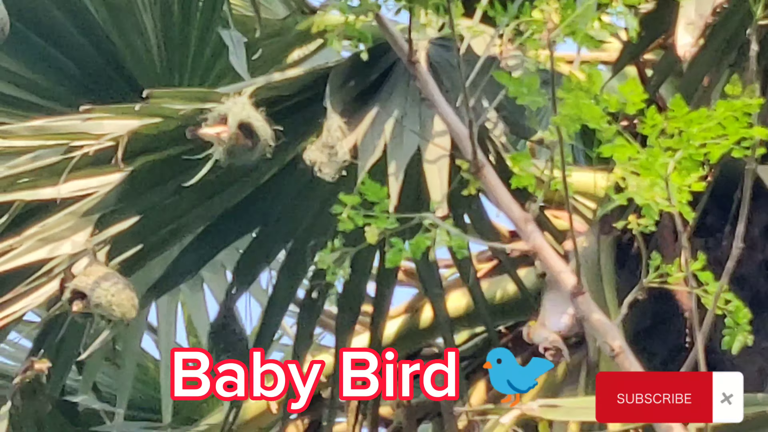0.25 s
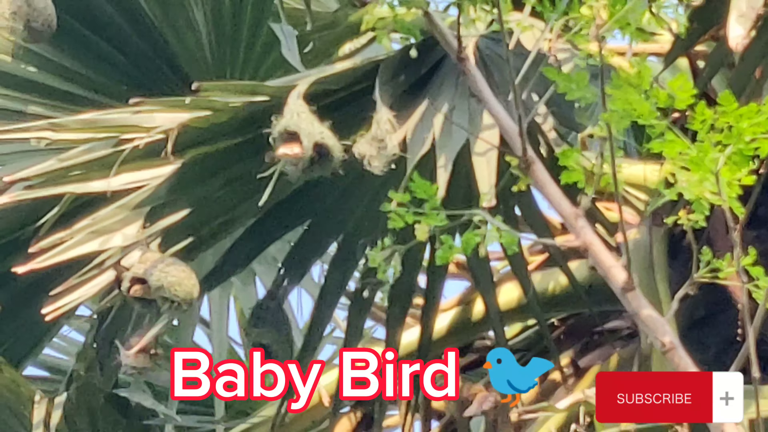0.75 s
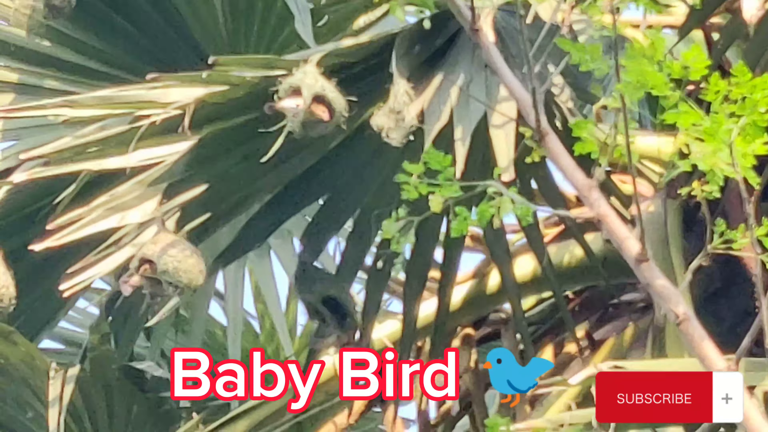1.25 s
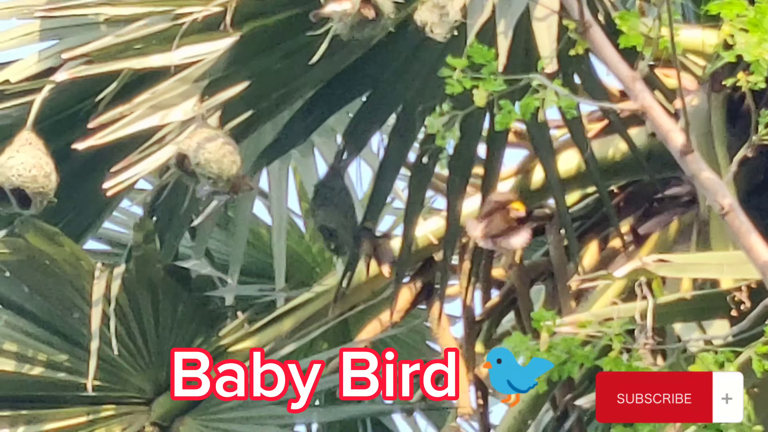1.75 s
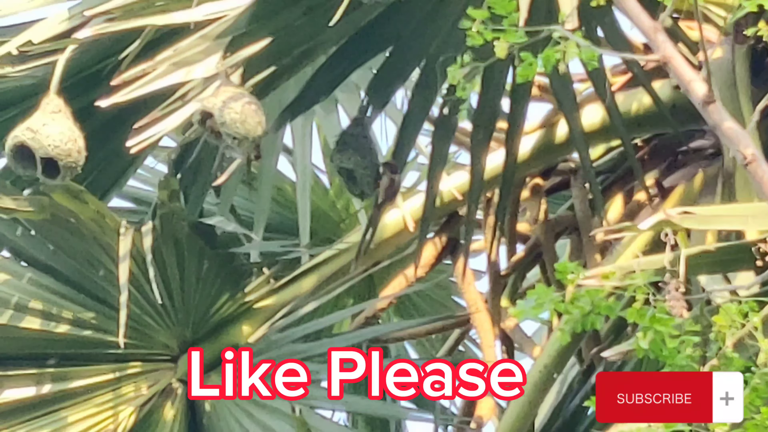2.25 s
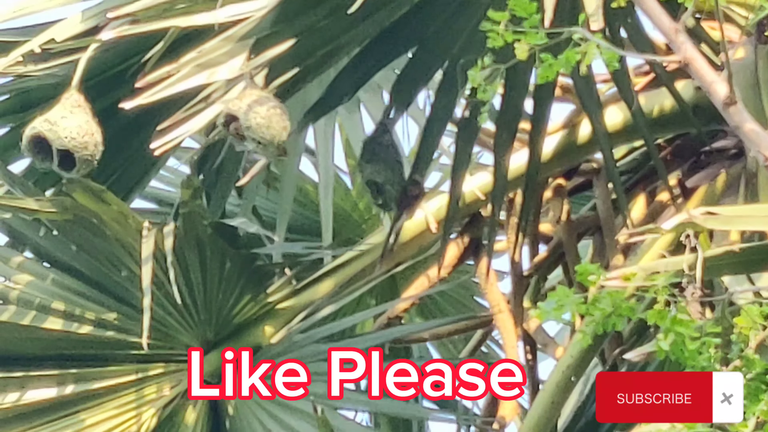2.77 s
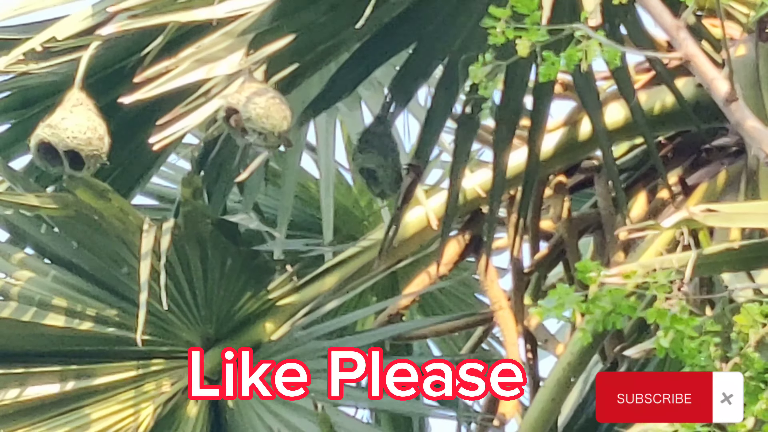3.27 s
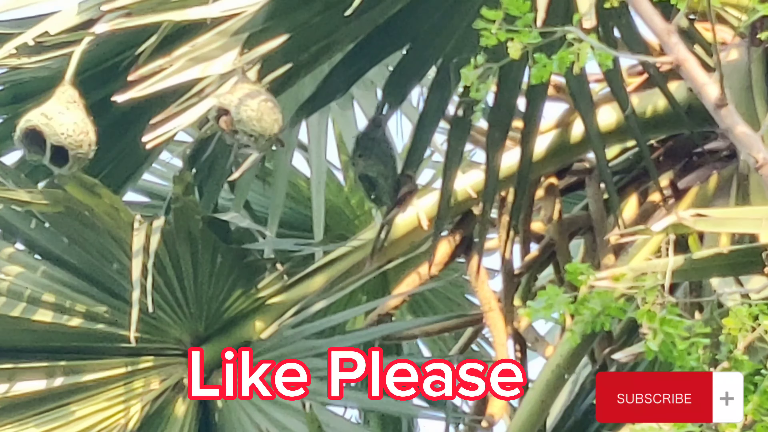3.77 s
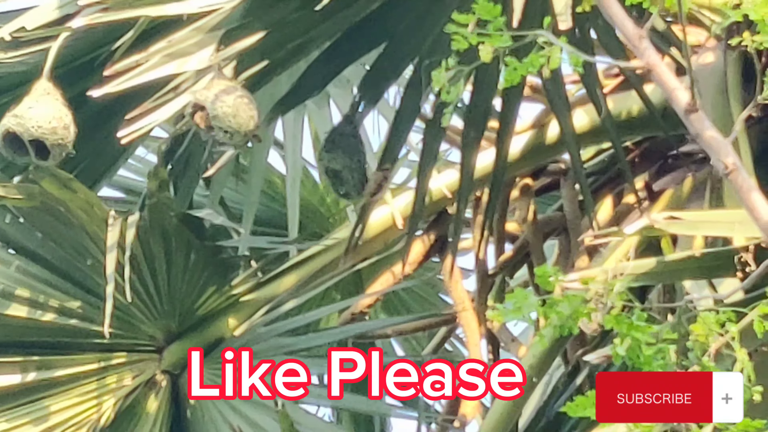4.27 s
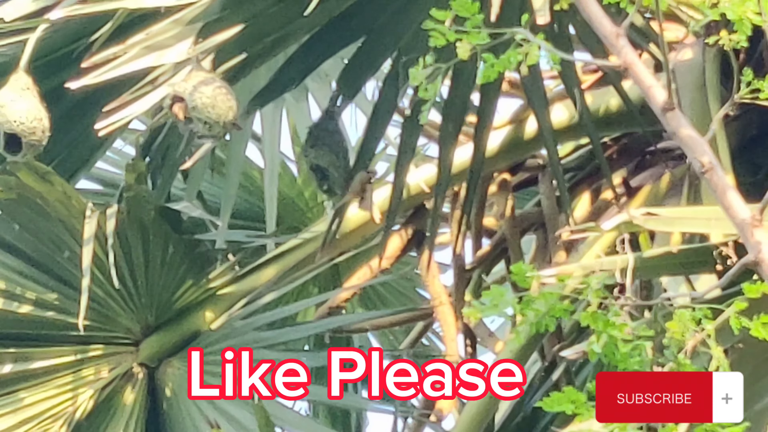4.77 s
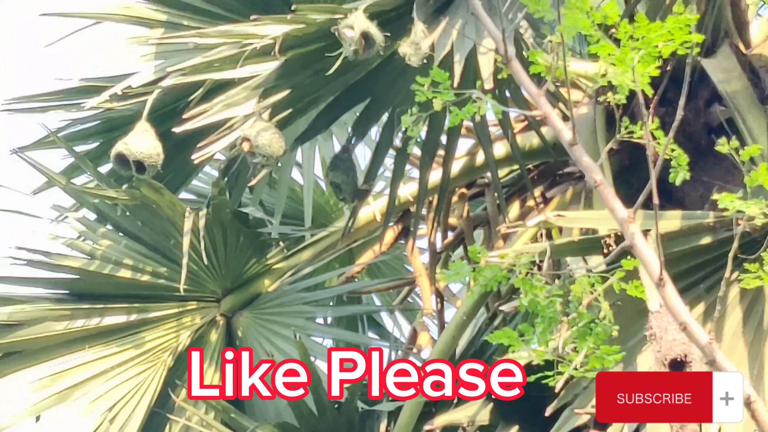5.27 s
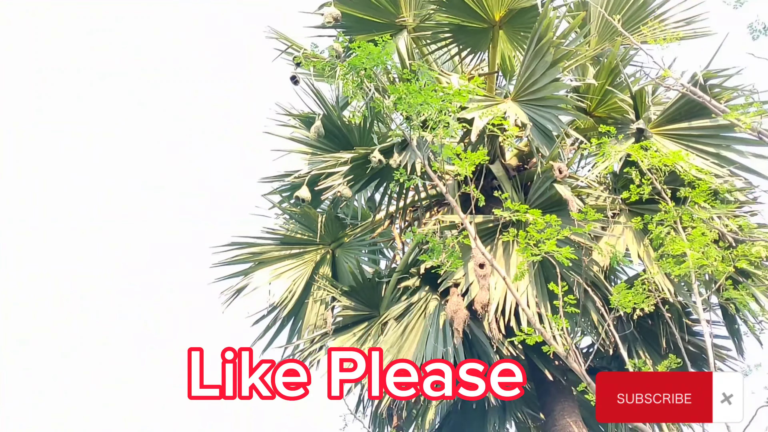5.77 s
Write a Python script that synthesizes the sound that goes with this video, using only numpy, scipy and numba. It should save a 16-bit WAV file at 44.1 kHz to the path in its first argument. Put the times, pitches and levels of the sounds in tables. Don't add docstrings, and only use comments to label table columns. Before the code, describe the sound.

A weaver bird colony chatters in dry buzzing rasps from a palm, with a whistle, a long buzz, faint dove coos and fingers bumping the phone.

```python
import sys
import numpy as np
from scipy import signal
from scipy.fft import rfft, irfft, next_fast_len
from scipy.io import wavfile
from scipy.ndimage import uniform_filter1d
from numba import njit

SR = 44100
rng = np.random.default_rng(int(sys.argv[2]) if len(sys.argv) > 2 else 0)


def unload_wav(signal):
    wavfile.write(
        sys.argv[1],
        SR,
        np.round(np.clip(np.atleast_2d(signal).T, -1, 1) * 32767).astype(np.int16),
    )


def attenuation_scalar(level_db):
    decades = np.asarray(level_db, float) / 20
    return 10 ** decades


N = 265482
T = np.arange(N) / SR

# frequency in Hz, level in dB per Hz.
AIR = [(12, -29), (20, -9), (60, -3), (113, -13.5), (210, -20.5), (270, -23), (367, -24), (738, -29),
       (1440, -34), (2910, -37.5), (3250, -38), (7110, -32), (8180, -45), (14300, -43), (16000, -35.5)]
# frequency in Hz, share from 0 to 1.
AIR_SHARED = [(60, 0.76), (300, 0.65), (800, 0.28), (1500, 0.05)]
# frequency in Hz, difference in dB.
AIR_PORTS = [(100, 1.5), (3000, -1), (6500, 0), (8200, -19.5), (9800, 0.5)]
# frequency in Hz, difference in dB.
BIRD_PORTS = [(1500, 2), (2600, 1), (3300, -12), (4200, 1), (5800, 3), (6800, -0.5), (8300, -16),
              (9600, -42)]
# frequency in Hz, gain in dB.
BIRD_TONE = [(900, 7.5), (1700, 2.5), (2600, 2), (2850, -0.5), (3600, 0), (8000, 2), (9000, -12),
             (10000, -53), (16000, -67)]
# frequency in Hz, gain in dB.
BEND = [(8500, -56), (10500, -23), (12500, -17), (14500, -1.5), (15400, 4), (15700, -62)]

# start in seconds, length in seconds, level in dB, pitch in Hz, throb from 0 to 1.
DOVE_OPENING = [
    (0.051, 0.077, -58, 600, 0),
    (0.121, 0.14, -53.5, 755, .1),
    (0.265, .11, -55, 630, .3),
    (0.38, 0.2, -64.5, 630, 0.3),
]
DOVE_OPENING_SAG = -53.5, 37, -5.5, 75
# start in seconds, level in dB, then lead-in, roll and hold lengths in seconds.
COOS = [
    (1.179, -58.5, 0.12, .15, .27),
    (2.098, -56.5, 0.091, .2, 0.22),
    (2.966, -56, 0.18, 0.19, 0.022),
]
# pitch in Hz, throb from 0 to 1, level in dB, pitch lost in Hz.
COO_HZ = (592, 636, 611)
COO_THROB = (0.15, 0.61, .15)
COO_DB = (-3, -2, -0.9)
COO_SAG = (-16, 20.4, 29.87)

# start in seconds, peak in dB, ring in Hz, left minus right in dB.
TAPS = [(0.011, -41, 251, -17.5), (1.823, -41, 328, 24.5), (1.85, -33, 305, 15.5), (1.912, -40.5, 193, 22),
        (2.182, -42, 251.5, 13.5), (2.682, -42.5, 447, 11), (2.73, -44, 263, -7),
        (3.399, -45.5, 203.3, 22.5), (3.568, -36, 225, -2), (4.044, -44.5, 295, 24), (4.366, -29, 563, -2),
        (5.795, -47, 207, -14)]
# start in seconds, length in seconds, first Hz, last Hz, level in dB.
CHIRPS = [
    (2.571, 0.018, 4440, 2947, -26),
    (2.594, 0.014, 3250, 2980, -38),
    (2.59, 0.15, 6060, 5470, -29.5),
    (3.155, 0.061, 1340, 1590, -52.5),
    (4.09, .05, 4940, 4820, -64),
    (4.215, 0.064, 4920, 4670, -60),
    (4.26, 0.0344, 6220, 5500, -50),
    (5.779, .05, 3810, 3440, -48.5),
    (5.779, 0.062, 7740, 6550, -46.5),
]
# start in seconds, length in seconds, first Hz, last Hz, level in dB.
SQUEAKS = [
    (3.568, 0.0029, 1410, 1610, -29),
    (3.588, 0.0083, 1440, 1293, -33.5),
    (4.372, 0.0055, 1297, 1731, -28),
    (4.418, 0.015, 1366, 1267, -36),
]
# start in seconds, length in seconds, level in dB.
DRONE = [
    (2.844, 0.062, -37.5),
    (2.9, 0.29, -32),
    (3.255, .13, -35),
]
# start in seconds, length in seconds, level in dB, first Hz, last Hz.
WHISTLE = [
    (1.96, 0.039, -46.5, 3760, 3790),
    (2.003, 0.025, -32, 3296, 3330),
    (2.02, 0.055, -23.5, 3490, 3478),
    (2.08, .095, -35, 3270, 3590),
    (2.177, .045, -34.5, 3580, 3640),
    (2.255, .075, -36.5, 3620, 3560),
    (2.332, 0.025, -27, 3370, 3300),
    (2.367, .035, -38.5, 3350, 3450),
    (2.403, 0.034, -30, 3460, 3440),
    (2.45, 0.075, -44, 3480, 3520),
]
# start in seconds, peak in dB, pitch in Hz.
SNAPS = [(0.755, -33, 5050), (0.9568, -20.5, 5130), (1.1361, -13, 5870), (1.1645, -14, 6480),
         (1.1715, -33, 6620), (1.271, -14.5, 5280), (1.3044, -25, 6070), (1.411, -14.5, 5620),
         (1.545, -24, 6320), (1.5937, -19, 6050), (1.7294, -14, 5720), (1.8627, -19, 5340),
         (2.0654, -29, 5050), (2.2228, -25, 5560), (2.445, -21, 5510)]
# start in seconds, length in seconds, level in dB,
# resonance in Hz, edge (beak) or chest (throat) in dB.
BUZZ = [
    [(2.61, 0.7845, -26, 5160, -51.5)],
    [(2.62, 0.798, -39, 3912, -16)],
]
# start in seconds, length in seconds, level in dB, throat in dB, edge in dB.
CHESTY = [
    (0.126, 0.026, -52.5, -4.5, -5.5),
    (0.24, .07, -42, -11, -5.5),
    (0.32, 0.047, -40.5, -11, -7.5),
    (0.426, 0.1, -36.5, -16, -22.5),
    (0.65, 0.019, -44.5, -10.5, -8.5),
]
THIN = [
    (3.866, 0.02, -45, -1, -5),
    (4.69, .025, -63, 1, -8),
    (4.93, 0.014, -47.5, 0, -7),
    (5.078, 0.016, -44, -3, -2),
    (5.199, 0.12, -40.5, -7.5, -26),
    (5.524, 0.11, -40.5, -7, -30.5),
]
# start in seconds, length in seconds, level in dB, beak in Hz, edge in dB.
BEAK_RASPS = [(0.72, 0.1, -25, 5950, -17.5), (0.87, 0.076, -35, 5960, -14), (0.94, 0.033, -30.5, 5200, -30),
              (1.058, 0.088, -30, 5960, -19.5), (1.125, 0.067, -24.5, 6290, -13.5),
              (1.2, 0.11, -29, 5930, -15.5), (1.26, 0.072, -30, 6330, -10.5),
              (1.35, 0.067, -30, 6000, -21.5), (1.51, .1, -26.5, 5670, -27.5),
              (1.62, 0.14, -32.5, 5530, -15), (1.71, 0.08, -35, 6040, -8.5), (1.8, 0.11, -31, 5400, -16.5),
              (1.992, 0.088, -36.5, 5420, -14), (2.165, 0.098, -34.5, 5550, -13.5),
              (2.29, 0.17, -32, 5550, -25), (2.44, 0.079, -28.5, 5550, -32.5),
              (2.655, 0.061, -29.5, 6150, -27), (2.78, 0.013, -52, 6120, 11), (2.95, 0.029, -37, 6400, -15),
              (3.15, 0.061, -32, 5610, -7.5), (3.497, 0.092, -36, 4810, -17.5)]
# start in seconds, length in seconds, level in dB, throat in Hz, chest in dB.
THROAT_RASPS = [(0.721, 0.12, -40, 4070, -3.5), (0.836, 0.12, -38.5, 3840, -10),
                (1.051, 0.081, -40.5, 3300, -14.5), (1.121, 0.11, -30, 3940, -23),
                (1.224, 0.064, -35.5, 3800, -19), (1.271, .09, -29.5, 3970, -20.5),
                (1.368, 0.049, -39, 3460, -17), (1.512, 0.12, -42.5, 3250, -6.5),
                (1.596, 0.15, -36.5, 3720, -19), (1.738, 0.068, -32.5, 3840, -23),
                (1.793, 0.11, -40.5, 3850, -7), (1.978, 0.11, -44, 2900, -9.5),
                (2.159, 0.078, -42.5, 2890, -10), (2.292, .24, -44.5, 2742, -7.5),
                (2.653, 0.059, -48.5, 3457, -1), (3.138, 0.11, -37, 4360, -20.5),
                (3.497, 0.083, -40, 3080, -9)]
# calls, beak in Hz, throat in Hz, chest level relative to the throat in dB.
LONE_BIRDS = [(CHESTY, 5950, 3500, 2), (THIN, 5950, 3910, -11.5)]

RASP_SHAPE = dict(swell_s=0.035, onset_db=13, sag_db=3, release_db_s=900, fade_s=0.004)
BUZZ_SHAPE = dict(swell_s=0.027, onset_db=12.5, sag_db=1.95, release_db_s=649, fade_s=0.0035)
NOTE_SHAPE = dict(swell_s=0.012, onset_db=3, sag_db=2, release_db_s=800, fade_s=0.004)
LEFT_LAG = 8
DRONE_HZ, OVERTONE_DB = 4120, -25
THROAT_FLOOR_HZ = 2800


def unit(x):
    return x / np.sqrt(np.mean(x ** 2))


def along(table, hz):
    f, v = np.transpose(table)
    return np.interp(np.log(hz + 1), np.log(f), v)


def shape(x, db, lag_s=0):
    size = next_fast_len(N + 2048)
    hz = np.arange(size // 2 + 1) * SR / size
    response = attenuation_scalar(db(hz)) * np.exp(-2j * np.pi * hz * lag_s)
    return irfft(rfft(x, size) * response, size)[..., :N]


def walk(rate):
    k = max(int(SR / rate), 1)
    held = rng.standard_normal(N // 16)[np.arange(N) // max(k, 17)]
    return unit(uniform_filter1d(uniform_filter1d(held, k), k))


@njit
def svf(x, g, k):
    y, b, l = np.empty(len(x)), 0., 0.
    for i in range(len(x)):
        v = (b + g[i] * (x[i] - l)) / (1 + g[i] * (g[i] + k[i]))
        b, l, y[i] = 2 * v - b, l + 2 * g[i] * v, k[i] * v
    return y


def ring(x, hz, width_hz):
    g = np.tan(np.pi * hz / SR) + np.zeros(N)
    k = width_hz / hz + np.zeros(N)
    return unit(svf(svf(x, g, k), g, k))


def calls(rows, swell_s, onset_db, sag_db, release_db_s, fade_s):
    power = np.full(N, 1e-14)
    mix = 1e-14 * np.outer([0, *rows[0][3:]], np.ones(N))
    for s, length, db, *columns in rows:
        t = np.arange(int((length + 50 / release_db_s) * SR)) / SR
        u = np.minimum(t / length, 1)
        rise_db = onset_db * min(length / 0.19, 1) * np.clip(1 - t / min(swell_s, length / 3), 0, 1)
        level_db = db - rise_db - sag_db * u - release_db_s * np.maximum(t - length, 0)
        p = np.minimum(t / fade_s, 1) ** 2 * attenuation_scalar(2 * level_db)
        power[int(s * SR):][:len(t)] += p
        mix[:, int(s * SR):][:, :len(t)] += p * np.array([u, *np.outer(columns, np.ones(len(t)))])
    return np.sqrt(power), *(mix / power)


def notes(rows):
    gain, u, first, last = calls(rows, **NOTE_SHAPE)
    return gain, uniform_filter1d(first + (last - first) * u, int(0.01 * SR))


def tone(gain, hz, wobble, wobble_hz, flutter_db, second_db, throb=0, throb_hz=0):
    beat = np.clip(throb, 0, 1) * np.sin(2 * np.pi * throb_hz * T)
    phase = 2 * np.pi * np.cumsum(hz * (1 + wobble * walk(wobble_hz) + 0.18 * beat)) / SR
    wave = np.sin(phase) + attenuation_scalar(second_db) * np.sin(2 * phase)
    return np.sqrt(2) * gain * attenuation_scalar(flutter_db * walk(wobble_hz)) * (1 + beat) * wave


def glides(table, step_db, wobble, top_hz, lift_db):
    out, waver = np.zeros(N), 1 + wobble * walk(500)
    for s, length, hz0, hz1, db in table:
        u = np.arange(int(length * SR)) / (length * SR)
        hz = hz1 + (hz0 - hz1) * (1 - u) ** 1.8
        phase = 2 * np.pi * np.cumsum(hz * waver[int(s * SR):][:len(u)]) / SR
        stack = np.zeros(len(u))
        for k in range(int(top_hz / max(hz0, hz1))):
            mouth_db = lift_db * np.exp(-(((k + 1) * hz1 - 6700) / 1800) ** 2)
            stack += attenuation_scalar(k * step_db + mouth_db) * np.cos((k + 1) * phase)
        envelope = np.minimum(1, 8 * np.minimum(u, 1 - u)) * (1 - 0.27 * u)
        out[int(s * SR):][:len(u)] += attenuation_scalar(db) * envelope * stack
    return out


def air():
    common, own = rng.standard_normal(N), rng.standard_normal((2, N))

    def share(hz):
        return np.clip(along(AIR_SHARED, hz), 0.01, 0.99)

    mix = shape(common, lambda hz: 10 * np.log10(share(hz)))
    mix = mix + shape(own, lambda hz: 10 * np.log10(1 - share(hz)))
    both = shape(mix, lambda hz: along(AIR, hz) + np.outer([0.5, -0.5], along(AIR_PORTS, hz)))
    low = shape(both, lambda hz: -10 * np.log10(1 + (hz / 1200) ** 4))
    swelling = low * attenuation_scalar(walk(1.186)) + (both - low) * attenuation_scalar(1.2 * walk(16))
    fading_db = 1.23 * (1 - T / 6)
    return attenuation_scalar(-48.5 + fading_db) * unit(swelling)


def dove():
    rows = [(*note, sag) for note, sag in zip(DOVE_OPENING, DOVE_OPENING_SAG)]
    for s, db, *parts in COOS:
        starts = s + np.cumsum([0, *parts[:-1]])
        rows += zip(starts, parts, db + np.array(COO_DB), COO_HZ, COO_THROB, COO_SAG)
    gain, u, hz, throb, sag = calls(rows, **NOTE_SHAPE)
    pitch = uniform_filter1d(hz - sag * u, int(0.025 * SR))
    return tone(gain, pitch, 0.01, 43, 0.39, -31.5, throb, throb_hz=38.8)


def taps():
    out, t = np.zeros((2, N)), np.arange(600) / SR
    for s, db, hz, pan_db in TAPS:
        push = -np.exp(-2.5 * hz * t) * np.cos(2 * np.pi * hz * t) * (1 - np.exp(-t / 0.00012))
        port_db = db + 6.5 + np.array([[pan_db], [-pan_db]]) / 2
        out[:, int((s + 0.002) * SR):][:, :600] += attenuation_scalar(port_db) * push
    return out


def chirps():
    return glides(CHIRPS, step_db=-17.5, wobble=0.016, top_hz=9030, lift_db=-1.5)


def squeaks():
    return glides(SQUEAKS, step_db=-2.0, wobble=0.036, top_hz=10420, lift_db=13)


def snaps():
    out, t = np.zeros(N), np.arange(500) / SR
    for s, db, hz in SNAPS:
        chance = uniform_filter1d(rng.standard_normal(500), size=20)
        phase = 2 * np.pi * np.cumsum(hz * (1 - 10.4 * t + 0.23 * chance)) / SR
        envelope = np.sin(np.pi * np.minimum(t / 0.0065, 1)) ** 0.41
        out[int(s * SR):][:500] += attenuation_scalar(db - 5.5) * envelope * np.sin(phase)
    return out


def drone():
    rows = [(*note, DRONE_HZ, DRONE_HZ) for note in DRONE]
    return tone(*notes(rows), wobble=0.007, wobble_hz=200, flutter_db=2.2, second_db=OVERTONE_DB)


def whistle():
    return tone(*notes(WHISTLE), wobble=0.00618, wobble_hz=90, flutter_db=2.4, second_db=OVERTONE_DB)


def rasp(high, low, form, rise_hz, slaps_hz, jitter, scatter_db, hiss_db, beak_width_hz, skirt_db,
         throat_width_hz, base_db, edge_hz, drift, flutter_db):
    gain, u, beak, edge_db = calls(high, **form)
    low_gain, _, throat, chest_db = calls(low, **form)
    phase = np.cumsum(slaps_hz * np.exp(jitter * walk(slaps_hz))) / SR
    slaps = np.diff(np.floor(phase), prepend=0) * attenuation_scalar(scatter_db * rng.standard_normal(N))
    source = unit(slaps) + attenuation_scalar(hiss_db) * rng.standard_normal(N)
    beak = (beak + rise_hz * u) * (1 + drift * walk(60))
    upper = unit(ring(source, beak, beak_width_hz) + attenuation_scalar(skirt_db) * ring(source, 5780, 1800))
    lower = ring(source, throat, throat_width_hz) + attenuation_scalar(base_db) * ring(source, 3170, 900)
    lower = attenuation_scalar(flutter_db * walk(34.68)) * lower
    edge = attenuation_scalar(edge_db + flutter_db * walk(35.32)) * ring(source, edge_hz, 2700)
    chest = attenuation_scalar(chest_db) * ring(source, 2264, 1500)
    above = gain * (attenuation_scalar(flutter_db * walk(35)) * upper + edge) - low_gain * lower
    above = shape(above, lambda hz: -10 * np.log10(1 + (THROAT_FLOOR_HZ / (hz + 1)) ** 20))
    return above + low_gain * chest


def buzz():
    return rasp(*BUZZ, BUZZ_SHAPE, rise_hz=259, slaps_hz=237.2, jitter=0.028, scatter_db=1.0, hiss_db=-11,
                beak_width_hz=750, skirt_db=-15, throat_width_hz=1310, base_db=-28, edge_hz=9600,
                drift=0.0088, flutter_db=1.3)


def colony():
    high, low = list(BEAK_RASPS), list(THROAT_RASPS)
    for rows, beak_hz, throat_hz, chest_db in LONE_BIRDS:
        for s, length, db, throat_db, edge_db in rows:
            high.append((s, length, db, beak_hz, edge_db))
            low.append((s, length, db + throat_db, throat_hz, chest_db))
    return rasp(high, low, RASP_SHAPE, rise_hz=-53, slaps_hz=890, jitter=0.4, scatter_db=4.0, hiss_db=-3.0,
                beak_width_hz=1280, skirt_db=-6.5, throat_width_hz=1500, base_db=-8, edge_hz=7220,
                drift=0.088, flutter_db=2.0)


def fronds(x, t60_s, wet_db, near_db):
    t = np.arange(int(0.4 * SR)) / SR
    bright = signal.sosfilt(signal.butter(1, 1800, "high", fs=SR, output="sos"), x)
    tail = rng.standard_normal((2, len(t))) * np.exp(-np.log(1000) * t / t60_s) * (t > 0.004)
    tail = tail / np.linalg.norm(tail[0])
    out = x + attenuation_scalar(wet_db) * signal.oaconvolve(bright[None], tail, axes=1)[:, :N]
    turn, fall = 2.06 * walk(7), np.exp(-t[:2000] / 0.012)
    for weight in (np.sin(turn), np.cos(turn)):
        near = rng.standard_normal((2, 2000)) * fall / np.linalg.norm(fall)
        out += attenuation_scalar(near_db) * signal.oaconvolve((bright * weight)[None], near, axes=1)[:, :N]
    return out / np.sqrt(1 + attenuation_scalar(2 * wet_db) + attenuation_scalar(2 * near_db))


def scene():
    hidden = colony() + chirps() + buzz()
    in_view = whistle() + snaps() + drone()
    squeak = squeaks()
    scattered = hidden + attenuation_scalar(-13.5) * in_view + attenuation_scalar(-1.5) * squeak
    heard = fronds(scattered, t60_s=0.48, wet_db=-4.0, near_db=6.0) * attenuation_scalar(1.5) + in_view
    left = shape(heard[0], lambda hz: along(BIRD_TONE, hz) + along(BIRD_PORTS, hz) / 2, LEFT_LAG / SR)
    right = shape(heard[1], lambda hz: along(BIRD_TONE, hz) - along(BIRD_PORTS, hz) / 2)
    coos = dove()
    far = np.array([np.roll(coos, shift=LEFT_LAG), coos])
    close = attenuation_scalar([[0.5], [-4]]) * np.array([np.roll(squeak, shift=LEFT_LAG // 2), squeak])
    return np.array([left, right]) + far + close + taps() + air()


def top_cut(x):
    return signal.sosfilt(signal.butter(12, 16730, fs=SR, output="sos"), x)


def record(dry):
    bent = dry + shape(dry ** 2, lambda hz: along(BEND, hz))
    return top_cut(bent)


dry = scene()
out = record(dry)
unload_wav(out)
```